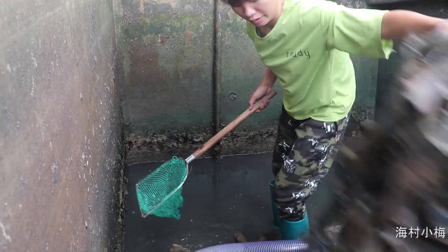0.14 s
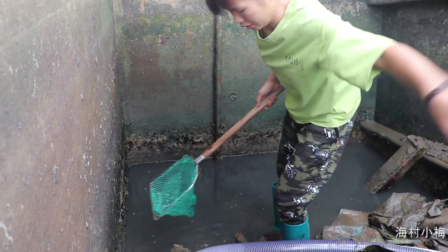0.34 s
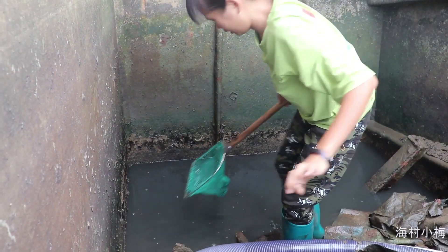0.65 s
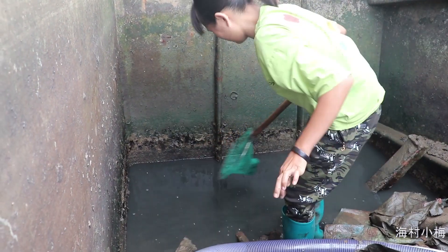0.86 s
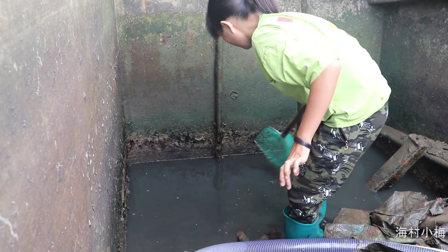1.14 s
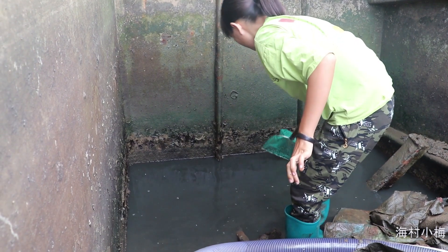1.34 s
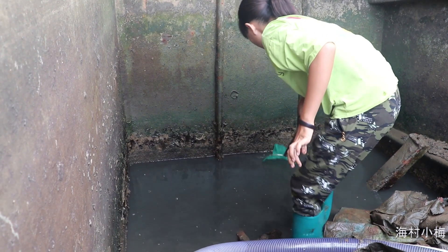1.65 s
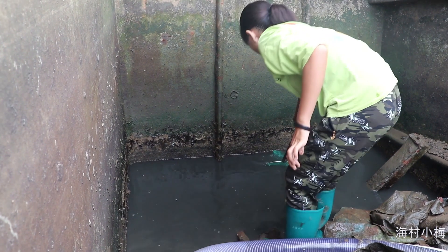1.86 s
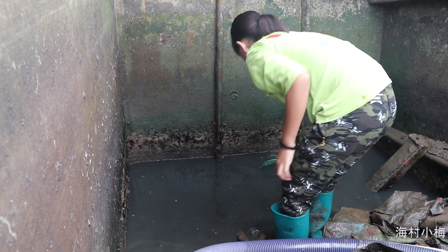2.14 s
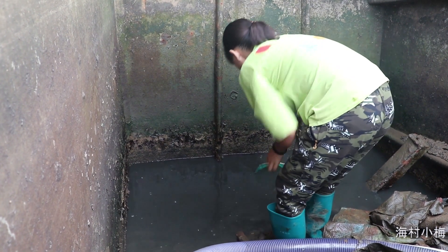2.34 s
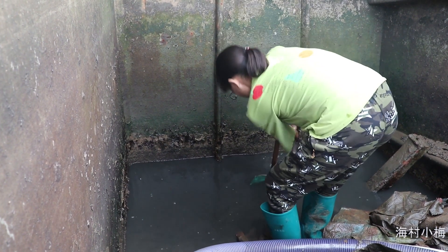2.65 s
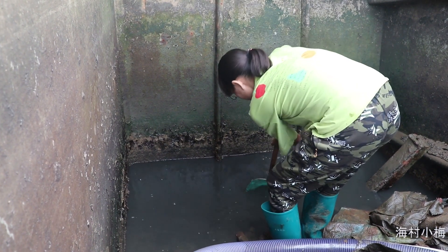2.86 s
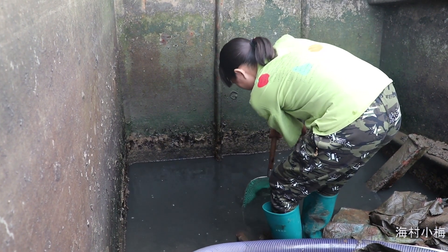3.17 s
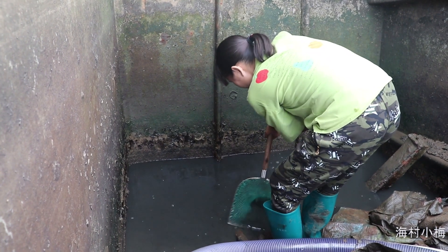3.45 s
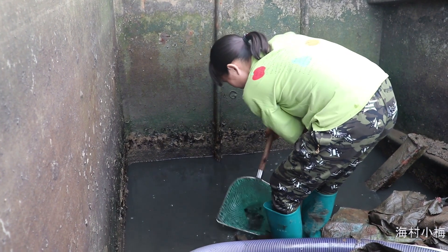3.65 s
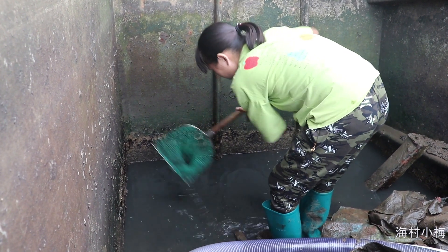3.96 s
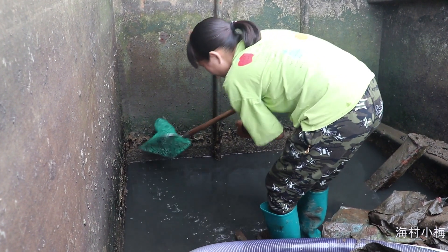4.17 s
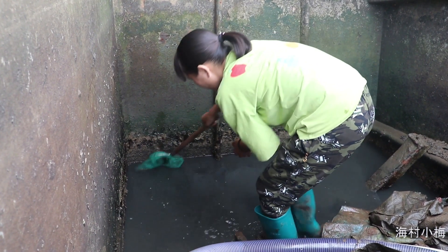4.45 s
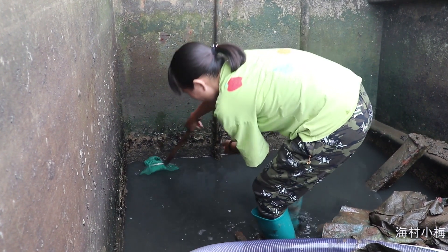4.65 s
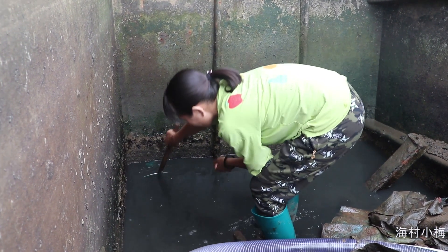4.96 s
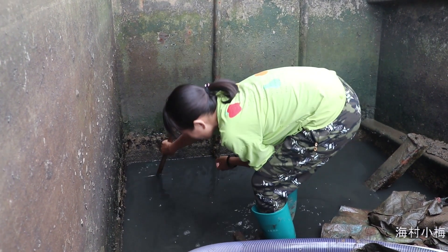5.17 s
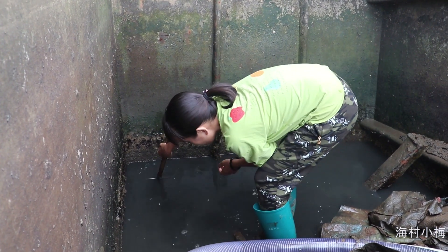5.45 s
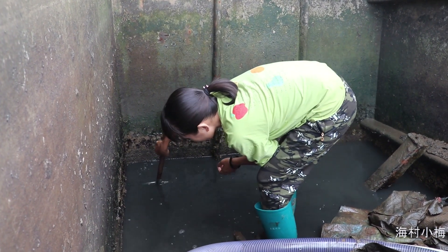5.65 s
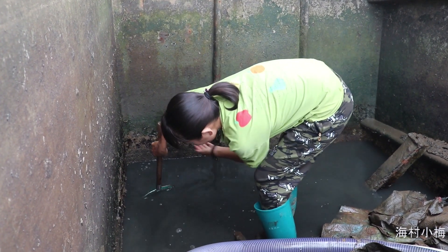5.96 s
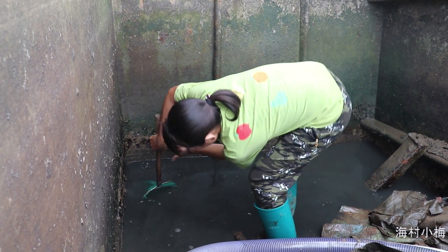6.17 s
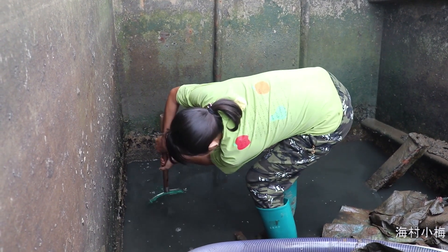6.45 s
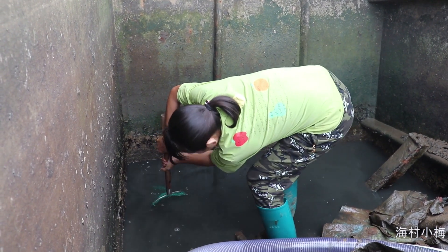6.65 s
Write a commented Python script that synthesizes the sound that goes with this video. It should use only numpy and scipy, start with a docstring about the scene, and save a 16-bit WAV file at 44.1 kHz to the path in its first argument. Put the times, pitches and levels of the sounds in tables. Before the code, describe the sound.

Someone wades and works a hand net in a boat's shallow, watery hold. A damp cloth flop comes first, then bright clacks and a dense burst of water slaps, then scattered bubbles. The frame knocks again, water drains in drops and gurgles, and a second plunge heaves the water before it quiets. Heard close in stereo, with brief reflections from hard walls over soft outdoor air and a faint throbbing engine.

```python
"""Water stirs and bubbles as someone wades in a boat's hold, over outdoor air and a far, throbbing engine.
A wet rag crumples down; a hand net's hoop then thuds, cracks and rings, and sets hard debris clinking.
Water is noise pops, slaps and drops through resonances, plus gliding sines for bubbles.
Noise-burst contacts ring the hoop; debris is dying sines, the engine close sines beating together.
A short, diffuse echo stands for the bare walls."""
import sys
import numpy as np
from scipy import signal
from scipy.io import wavfile
from scipy.ndimage import uniform_filter1d, map_coordinates

SR = 44100
rng = np.random.default_rng(int(sys.argv[2]) if len(sys.argv) > 2 else 0)


def wav_out(sig):
    """Save sig, one row per channel (or a flat mono array), as 16-bit PCM at SR to the path in sys.argv[1]."""
    wavfile.write(sys.argv[1], SR, np.round(np.clip(np.atleast_2d(sig).T, -1, 1) * 32767).astype(np.int16))


N = 300321
TIME = np.arange(N) / SR


def from_db(db):
    """Turns decibels into an amplitude factor."""
    return 10 ** (np.asarray(db) / 20)


def rms_one(x):
    """Scales a sound to rms 1."""
    return x / np.sqrt(np.mean(x ** 2) + 1e-20)


def blow(x):
    """Scales a short sound to the energy of 10 ms at rms 1."""
    return x / np.sqrt(np.sum(x ** 2) / (SR / 100) + 1e-20)


def at_hz(points, hz):
    """Reads a table on a log-frequency axis."""
    table_hz, values = np.array(points).T
    return np.interp(np.log(hz), np.log(table_hz), values)


def band(x, low_hz, high_hz, order=2):
    """Causal band-pass."""
    edges_hz = [low_hz, min(high_hz, SR / 2 - 500)]
    return signal.sosfilt(signal.butter(order, edges_hz, "band", fs=SR, output="sos"), x + 1e-18)


def resonate(x, hz, width_hz):
    """A two-pole resonance with gain 1 on top."""
    r = np.exp(-np.pi * width_hz / SR)
    feed = np.array([1, 0, -1]) * (1 - r * r) / 2
    feedback = [1, -2 * r * np.cos(2 * np.pi * hz / SR), r * r]
    return signal.lfilter(feed, feedback, x + 1e-18)


def add(out, s, sound):
    """Lays a short sound into out at time s."""
    i = max(round(s * SR), 0)
    out[..., i:i + sound.shape[-1]] += sound[..., :max(N - i, 0)]


def panned(sound, pan_db):
    """Makes the left louder than the right by pan_db."""
    return sound * from_db([[pan_db / 2], [-pan_db / 2]])


def swell_db(start_s, length_s, rise_db_per_s, fall_db_per_s, sag_db_per_s=0):
    """Attack, hold and release in dB below the top; the attack ends at start_s."""
    age = TIME - start_s
    attack = rise_db_per_s * np.minimum(age, 0)
    sag = sag_db_per_s * np.clip(age, 0, length_s)
    release = fall_db_per_s * np.maximum(age - length_s, 0)
    return attack - sag - release


def burst(decay_s):
    """A quickly dying cluster of tiny impacts, made of noise."""
    t = TIME[:SR // 10]
    return rng.standard_normal(len(t)) * np.exp(-t / decay_s)


def scuffed(decay_s, lead_s, scuff_db):
    """A contact that scuffs faintly for lead_s before it lands and rattles out."""
    t = TIME[:SR // 10] - lead_s
    scuff = from_db(scuff_db) * (1 + t / lead_s)
    rattle = np.exp(-np.abs(t) / decay_s)
    return rng.standard_normal(len(t)) * np.where(t < 0, scuff, rattle)


def grains(hz, per_s, spread_db, sharpness):
    """Random small pops of uneven size ringing at one pitch; rms 1."""
    clicks = np.zeros(N)
    at = np.flatnonzero(rng.random(N) < per_s / SR)
    size = np.minimum(rng.exponential(1, N), 3)
    sign = np.sign(rng.random(N) - .5)
    clicks[at] = from_db(spread_db * size[at]) * sign[at]
    ringing = resonate(clicks, hz, hz / sharpness)
    return rms_one(band(ringing, hz / 2, hz * 2, order=1))


def chirp(hz, ring_ms, rise):
    """An air pocket rings and glides by the fraction rise; ring_ms is its t60 at 1 kHz, shorter above."""
    t60_s = ring_ms / 1000 * (1000 / hz) ** .6
    age = TIME[:SR // 8] / t60_s
    phase = 2 * np.pi * np.cumsum(hz * (1 + rise * np.minimum(age, 1))) / SR
    envelope = (1 - np.exp(-age * 25)) * np.exp(-np.log(1000) * age)
    return envelope * np.sin(phase)


# how alike left and right are: pitch_hz, likeness (1 = identical)
LIKENESS = [(30, 0.41), (70, 0.8), (150, 0.95), (300, 0.97), (600, 0.33), (1200, 0.25), (3000, 0.032),
            (16000, 0.1)]


def diffuse_bands(size):
    """Half-octave bands of stereo noise, alike in the bass and mostly unrelated in the treble: (Hz, noise)."""
    edges_hz = 22 * 2 ** np.arange(0, 10.1, .5)
    white = rng.standard_normal((2, 2, size))
    for k, (low_hz, high_hz) in enumerate(zip(edges_hz, edges_hz[1:])):
        mid, side = band(white[k % 2], low_hz, high_hz)
        hz = np.sqrt(low_hz * high_hz)
        alike = np.clip(at_hz(LIKENESS, hz), -1, 1)
        yield hz, np.sqrt(1 + alike) * mid + np.sqrt(1 - alike) * side * [[1], [-1]]


# a boot shifts and heaves the water: peak_s, level_db
HEAVES = [(1.0, -49), (4.75, -35), (6.41, -50)]
HEAVE_DB_PER_S = 110   # rise and fall
WADING_DB, WADING_BUILDS_S, WADING_GROWTH_DB = -52.5, 2.1, 18


def wading():
    """Strength of the low stir: it builds up, then stays, with a surge at each heave."""
    steady = from_db(WADING_DB - WADING_GROWTH_DB * np.maximum(1 - TIME / WADING_BUILDS_S, 0))
    surges = [from_db(db - HEAVE_DB_PER_S * np.abs(TIME - s)) for s, db in HEAVES]
    return np.sqrt(steady ** 2 + np.sum(np.square(surges), axis=0))


# tone of the air and the low stir: pitch_hz, relative_level_db (per Hz)
AIR_COLOUR = [(15, -35), (25, -12.5), (76, -8.5), (114, 2.5), (157, -0.5), (516, -13.5), (560, -35),
              (863, -11.5), (962, -13.5), (2840, -16.5), (3250, -16.5), (3520, -18), (10400, -22),
              (16000, -36)]
AIR_DB = -47.5
# close engine partials: pitch_hz, level_db (before nearness)
ENGINE = [(146, -56), (159, -50), (172, -63)]


def background():
    """Outdoor air, the low stir of wading and a far engine whose close partials throb."""
    bands = [(hz, from_db(at_hz(AIR_COLOUR, hz)) * noise) for hz, noise in diffuse_bands(N)]
    air = rms_one(sum(noise for hz, noise in bands if hz > 100))
    low = rms_one(sum(noise for hz, noise in bands if hz <= 100))
    # the engine's speed is never quite steady
    wander = np.cumsum(rng.standard_normal(N)) / np.sqrt(N)
    engine = np.zeros((2, N))
    for hz, db in ENGINE:
        turns = hz * TIME + 2 * wander + rng.random()
        engine += from_db(db) * np.sin(2 * np.pi * (turns + [[0], [.5]]))   # opposite in the two ears
    nearness = np.interp(TIME, [1, 5.3], [.25, .85])
    return from_db(AIR_DB) * air + wading() * low + nearness * engine


# swells of water noise (pushes, ripples or cloth rustle, draining):
# start_s, length_s, gurgle_db, splash_db, spray_db (before colour)
SWELLS = [(0.015, 0.16, -71, -51.5, -48), (0.248, 0.15, -51, -46.5, -41.5), (0.738, 0.11, -37, -39, -44.5),
          (0.953, 0.28, -47.5, -46, -48), (1.443, 0.1, -39, -24, -35.5), (1.59, 0.054, -33, -38.5, -36),
          (1.804, 0.34, -41, -44, -51), (2.935, 0.078, -48.5, -36.5, -42), (3.14, 0.1, -42, -37.5, -52.5),
          (3.382, 0.16, -45, -40.5, -40), (3.614, 0.22, -56, -41.5, -38.5), (3.909, .1, -45, -39.5, -44.5),
          (4.08, 0.33, -71, -54.5, -45), (4.475, .25, -52, -36, -41.5), (4.842, 0.12, -38.5, -32, -40.5),
          (5.07, 0.097, -43, -37.5, -45.5), (6.39, .1, -44, -45, -49.5)]
# each swell rises, slackens as it goes on, then the water settles
SWELL_DB_PER_S, SAG_DB_PER_S, SETTLE_DB_PER_S = 294, 5.5, 112
# ripples between swells
CALM_GURGLE_DB, CALM_SPLASH_DB, CALM_SPRAY_DB = -54.5, -67.5, -63.5


def stirred():
    """Levels of gurgle, splash and spray in dB: the swells add up over the calm ripples."""
    power = from_db([[CALM_GURGLE_DB], [CALM_SPLASH_DB], [CALM_SPRAY_DB]]) ** 2
    for start_s, length_s, *levels_db in SWELLS:
        swell = from_db(swell_db(start_s, length_s, SWELL_DB_PER_S, SETTLE_DB_PER_S, SAG_DB_PER_S))
        power = power + np.outer(from_db(levels_db), swell) ** 2
    return 10 * np.log10(power)


def slosh():
    """Large bubbles gurgle, smaller ones splash, the finest fizz as spray; they clump and spread in stereo."""
    gurgle_db, splash_db, spray_db = stirred()
    # pitch_hz, relative_level_db per bubble size
    colour = [(130, -13), (250, -12.0), (450, -9.0), (800, -15.0), (1300, -11.5), (2500, -9),
              (4000, -10.5), (8000, -9.5), (14000, -16)]
    clumps = rms_one(uniform_filter1d(rng.standard_normal(N), size=SR // 70))
    out = np.zeros((2, N))
    for hz in np.geomspace(130, 14500, 32):
        # shares of gurgle and spray at this pitch; splash takes the rest
        large = np.clip(at_hz([(500, 0.83), (950, 0.027)], hz), 0, 1)
        fine = np.clip(at_hz([(2100, 0.22), (4500, 1)], hz), 0, 1)
        level_db = large * gurgle_db + fine * spray_db + (1 - large - fine) * splash_db + at_hz(colour, hz)
        per_s = 65 * (hz / 1000) ** .3
        pops = from_db(level_db) * grains(hz, per_s, spread_db=5.5, sharpness=9)
        out += [pops, np.roll(pops, rng.integers(-5, 6))]   # a few samples apart
    return from_db(-4 + 3.7 * clumps) * out


# the loudest bubbles: start_s, start_pitch_hz, level_db (before trim)
BUBBLES = [(.41, 276, -26.5), (.79, 465, -30.5), (.965, 542, -25), (1.037, 1590, -31), (1.09, 418, -32),
           (1.51, 490, -23), (1.555, 495, -21), (1.66, 2300, -21.5), (2.015, 383, -34.5), (2.05, 306, -33),
           (2.075, 860, -32), (2.136, 261, -30.5), (2.19, 1410, -33.5), (2.595, 3110, -32.5),
           (2.697, 830, -38), (3.44, 261.4, -31.5), (3.628, 510, -31), (3.725, 1330, -23),
           (3.78, 1690, -17), (4.598, 770, -31.5), (4.643, 1350, -28), (4.673, 2920, -24),
           (4.85, 1050, -22), (5.11, 510, -29), (5.135, 830, -26.5), (6.796, 1750, -23.5)]
# stray bubbles: the loudest above the splash, and how much weaker the rest
CROWD_DB, CROWD_SPREAD_DB = 6.5, 13


def bubbles():
    """Each loud bubble sheds a smaller one just after it; a random crowd follows the splash level."""
    out = np.zeros(N)
    for s, hz, db in BUBBLES:
        add(out, s, from_db(db + 5.5) * chirp(hz, ring_ms=29.7, rise=0.093))
        add(out, s + 0.013, from_db(db - 3) * chirp(hz * 1.136, ring_ms=17, rise=0.13))
    splash_db = stirred()[1]
    for when, size, depth, glide in rng.random((300, 4)):
        i = int(when * N)
        level_db = splash_db[i] + CROWD_DB - CROWD_SPREAD_DB * depth
        stray = chirp(800 * 5 ** size, ring_ms=50, rise=.6 * glide - .15)
        add(out, i / SR, from_db(level_db) * stray)
    return out


# strings of bubbles from a filling or draining hollow:
# start_s, length_s, first_pitch_hz, last_pitch_hz, level_db (before trim and scatter)
GURGLES = [(3.469, 0.045, 1400, 780, -32), (3.621, .08, 545, 430, -33.5), (3.652, 0.14, 1185, 1730, -27),
           (4.566, .08, 2200, 1220, -34), (4.637, 0.053, 1340, 3070, -34), (4.697, 0.053, 1690, 1090, -35),
           (4.775, .07, 2580, 1140, -30), (5.101, 0.058, 505, 1180, -28.5)]
# trim, scatter of pitch (fraction) and of strength
STRING_DB, STRING_DETUNE, STRING_UNEVEN_DB = 1.5, 0.033, 2


def gurgles():
    """Bubbles pinch off in quick succession while the hollow changes size."""
    out = np.zeros(N)
    for s, length_s, first_hz, last_hz, db in GURGLES:
        steps = (np.arange(12) + rng.random(12)) / 12
        for along in steps:
            detune, strength = rng.standard_normal(2)
            hz = first_hz * (last_hz / first_hz) ** along * (1 + STRING_DETUNE * detune)
            level_db = db + STRING_DB + STRING_UNEVEN_DB * strength
            add(out, s + along * length_s, from_db(level_db) * chirp(hz, ring_ms=25, rise=0.055))
    return out


# the lifted net drains through its mesh
DRAIN_FROM_S, DRAIN_FOR_S, DRAIN_DROPS = 3.1, 1.05, 18
DRAIN_DB, DRAIN_SPREAD_DB = -32, 2   # before the trim in drops()
DRAIN_LOW_HZ, DRAIN_OCTAVES = 1790, 2.15


def drain():
    """Drops leave the lifted mesh at random: rows like those of DROPS."""
    return [(DRAIN_FROM_S + DRAIN_FOR_S * when,
             DRAIN_DB - DRAIN_SPREAD_DB * weak,
             DRAIN_LOW_HZ * 2 ** (DRAIN_OCTAVES * small))
            for when, weak, small in rng.random((DRAIN_DROPS, 3))]


# single drops and small taps: start_s, level_db (before trim), centre_hz
DROPS = [(0.0779, -34.5, 2090), (1.7913, -25.5, 2960), (1.9316, -20, 5750), (2.3334, -32.5, 4060),
         (2.363, -33.5, 4250), (3.612, -28.5, 2270), (4.1386, -27, 5100), (4.3011, -32, 7300),
         (4.339, -27, 6160), (5.3724, -31.5, 1480), (6.0247, -32, 4870), (6.231, -31, 2400),
         (6.6154, -26.5, 6000)]


def drops():
    """Each drop or tap lands with a small bright tick of resonant noise."""
    out = np.zeros(N)
    for s, db, hz in list(DROPS) + drain():
        tick = band(resonate(burst(decay_s=0.0014), hz, 0.58 * hz), 1660, 22500)
        add(out, s, from_db(db - 12.0) * blow(tick))
    return out


# water slaps, and at 1.586 s the hiss of a scrape:
# start_s, slap_db, body_db, spray_db, centre_hz (slap and body before trim)
SLAPS = [(0.962, -39, -29.5, -70, 710), (1.31, -19, -29.5, -36, 1190), (1.409, -17, -30.5, -29.5, 1360),
         (1.468, -15.5, -27, -39.5, 1410), (1.509, -13, -24, -39, 1260), (1.586, -29, -25.5, -26, 1600),
         (1.68, -26, -26, -50, 1090), (3.368, -40, -34.5, -39.5, 716), (3.425, -36.5, -44, -38, 955),
         (3.907, -56, -33, -68, 710), (4.48, -35, -44, -41, 726), (4.617, -35, -56, -37, 1370),
         (4.79, -28.5, -36, -36, 2000), (4.845, -27.5, -31, -30.5, 1100), (5.113, -26.5, -41, -34, 1600)]
REBOUND_S, REBOUND_DB = 0.007, -2   # each sounds a second time, as water falling back does


def slaps():
    """A cavity smacks shut in a cycle or two, with a low body and a scatter of spray; a scrape shares the recipe."""
    out, t = np.zeros(N), TIME[:SR // 10]
    rebounds = [(s + REBOUND_S, *np.add(levels_db, REBOUND_DB), hz) for s, *levels_db, hz in SLAPS]
    for s, slap_db, body_db, spray_db, centre_hz in list(SLAPS) + rebounds:
        pop = np.exp(-t / 0.0006) * np.sin(2 * np.pi * centre_hz * t)
        froth = resonate(burst(decay_s=0.0058), centre_hz, 1700)
        smack = band(blow(pop) + .5 * blow(froth), 820, 6700)
        body = band(burst(decay_s=0.0039), 216, 580)
        spray = band(resonate(burst(decay_s=0.0062), 4100, 11200), 1850, 10900)
        add(out, s, from_db(slap_db - 8.5) * blow(smack))
        add(out, s, from_db(body_db - 6) * blow(body))
        add(out, s, from_db(spray_db) * blow(spray))
    return out


# tone of the wet cloth: pitch_hz, relative_level_db (per Hz)
RAG_COLOUR = [(41, -54), (70, -22), (110, -31), (321, -12.5), (422, 6), (727, -18.5), (1230, -2.5),
              (1340, -7), (7390, -19), (12700, -28), (16000, -42)]
# the rag lands, slumps for a moment and comes to rest
RAG_LANDS_S, RAG_SLUMP_S, RAG_DB = 0.42, 0.092, -27.5
RAG_RISE_DB_PER_S, RAG_FALL_DB_PER_S = 448, 167


def rag():
    """Wet cloth collapses in a dense crumple of pops, with low noise for its weight."""
    level_db = RAG_DB + swell_db(RAG_LANDS_S, RAG_SLUMP_S, RAG_RISE_DB_PER_S, RAG_FALL_DB_PER_S)
    folds = np.zeros(N)
    for hz in np.geomspace(100, 14000, 16):
        gain = from_db(at_hz(RAG_COLOUR, hz)) * np.sqrt(hz)   # wider bands hold more energy
        folds += gain * grains(hz, per_s=700, spread_db=-0.5, sharpness=1.43)
    weight = band(rng.standard_normal(N), 114, 230)
    return from_db(level_db) * (rms_one(folds) + from_db(-17.5) * rms_one(weight))


# bits of hard debris set ringing by the hoop: start_s, pitch_hz, level_db (before trim), t60_s, left_right_db
CLINKS = [(1.158, 7040, -24.5, 0.056, 10), (1.228, 5450, -8.5, 0.025, 2), (1.23, 3940, -4.5, 0.023, -13),
          (1.366, 2630, -8, 0.03, 13), (1.373, 4300, 0, 0.026, 10.5), (1.368, 6500, -14, 0.031, 0),
          (1.595, 5550, -15, 0.066, 0), (1.855, 5340, -9, 0.065, 3), (1.859, 7030, -8, 0.024, -5),
          (1.857, 12800, -18, 0.027, 5), (2.058, 2500, -18, 0.032, 12), (3.113, 3460, -7.5, 0.017, 13),
          (6.436, 4530, -6, 0.02, 3)]


def clinks():
    """Small hard pieces ring for a moment, chattering against the hoop and damped by the wet."""
    out, t = np.zeros((2, N)), TIME[:SR // 4]
    for s, hz, db, t60_s, pan_db in CLINKS:
        chatter = rms_one(band(rng.standard_normal(len(t)), 25, 400))
        tone = np.sin(2 * np.pi * hz * t + 0.44 * chatter)
        fade = from_db(-60 * t / t60_s)
        add(out, s, panned(from_db(db - 1.5) * fade * tone, pan_db))
    return out


# hoop and handle knocking:
# start_s, ring_db, thud_db, crack_db (all before trim), centre_hz, left_right_db, contact_s
KNOCKS = [(1.2278, -12, -19.5, -19, 3870, 2, 0.0015), (1.3663, -13, -16, -17.5, 4350, 7.5, 0.0015),
          (1.3701, -14.5, -22.5, -24, 4320, -17, 0.002), (1.5952, -17, -38, -14.5, 5900, 0, 0.0022),
          (1.8529, -20, -17.5, -16.5, 4040, 0.5, 0.0024), (2.059, -19.5, -46, -30.5, 3300, -2, 0.005),
          (2.8406, -12.5, -31, -25, 3870, 1.5, 0.0024), (2.9255, -17, -49, -45, 1880, 2.5, 0.0035),
          (2.9667, -21.5, -34.5, -32.5, 3730, -1, 0.0058), (3.1127, -7, -29, -10, 4430, -0.5, 0.0022),
          (4.951, -19.5, -23.5, -31, 3200, -0.5, 0.0078), (5.394, -28.5, -37.5, -36, 1710, -1, 0.013),
          (6.4351, -10, -22, -21.5, 3460, 1, 0.0022)]
# what the net's frame rings with: pitch_hz, width_hz, relative_level_db
FRAME = [(1130, 100, 0), (1910, 450, 2.5), (2120, 136, 4), (2535, 350, 2), (3000, 335, 4), (3650, 740, 5),
         (4480, 970, 5.5), (5440, 610, -0.5), (7400, 3000, -33)]


def knocks():
    """Each contact thuds, cracks and rings the frame, most near the pitch that its hardness favours."""
    out = np.zeros((2, N))
    lead_s = .01
    for s, ring_db, thud_db, crack_db, centre_hz, pan_db, contact_s in KNOCKS:
        force = scuffed(contact_s, lead_s, scuff_db=-21.5)
        ring = np.zeros(len(force))
        for k, (hz, width_hz, db) in enumerate(FRAME):
            favoured_db = db - 4.9 * np.log2(hz / centre_hz) ** 2
            ring += (-1) ** k * from_db(favoured_db) * blow(resonate(force, hz, width_hz))
        thud = band(resonate(force, 1840, 1270), 156, 1720)
        crack = band(resonate(force, 6570, 3400), 5650, 17400)
        sound = from_db(ring_db - 6) * blow(ring)
        sound += from_db(thud_db - 4) * blow(thud)
        sound += from_db(crack_db - 6) * blow(crack)
        add(out, s - lead_s, panned(sound, pan_db))
    return out


# where the net works: time_s, left_lead_ms (negative: right leads)
BEARING = [(0, -0.11), (.55, -.12), (.8, 0.17), (1.4, 0.13), (2.1, 0.18), (4.2, 0.17), (4.8, 0.024),
           (5.3, -0.1), (6.81, -0.017)]


def at_ears(sound):
    """The direct sound reaches one ear before the other."""
    lead_ms = np.interp(TIME, *np.transpose(BEARING))
    left, right = np.broadcast_to(sound, (2, N))
    return np.array([left, map_coordinates(right, [np.arange(N) - lead_ms * SR / 1000], order=3)])


# ring time of the bare walls: pitch_hz, t60_s
HOLD = [(100, 0.12), (400, 0.25), (1500, 0.25), (4000, 0.28), (8000, 0.25), (16000, 0.12)]


def hold_echo(build_s):
    """Dense reflections build up over about build_s, then die at each band's own rate; energy 1."""
    t = TIME[:SR * 2 // 3]
    tail = sum(noise * from_db(-60 * t / at_hz(HOLD, hz)) for hz, noise in diffuse_bands(len(t)))
    tail = tail * (1 - np.exp(-(t / build_s) ** 2))
    return rms_one(tail) / np.sqrt(len(t))


def hold(sound):
    """The pattern of reflections changes as the net moves about: eight echoes crossfade."""
    spots_s = np.linspace(0, TIME[-1], num=8)
    out = np.zeros((2, N))
    for s in spots_s:
        share = np.sqrt(np.clip(1 - np.abs(TIME - s) / spots_s[1], 0, 1))
        near = np.flatnonzero(share)
        echo = signal.fftconvolve((sound * share)[:, near], hold_echo(build_s=0.00043), axes=1)
        add(out, near[0] / SR, echo)
    return out


def scene():
    """Mixes the direct sources, their echo from the walls and the background."""
    hoop, debris, smacks = knocks(), clinks(), slaps() + drops()
    water, pockets = slosh() + rag(), bubbles() + gurgles()
    to_walls = from_db(-1.5) * hoop + from_db(-5.0) * debris + from_db(3) * smacks
    to_walls = to_walls + from_db(1.5) * water + from_db(-1.5) * pockets
    direct = at_ears(hoop + debris + smacks + water + pockets)
    return panned(direct + hold(to_walls), pan_db=0.8) + background()


CUTOFF_HZ = 16000


def record(dry):
    """Peaks beyond full scale are clipped; then the top is cut steeply."""
    low_pass = signal.ellip(12, .2, 90, CUTOFF_HZ, fs=SR, output="sos")
    return signal.sosfilt(low_pass, np.clip(dry, -1, 1))


dry = scene()
out = record(dry)
wav_out(out)
```